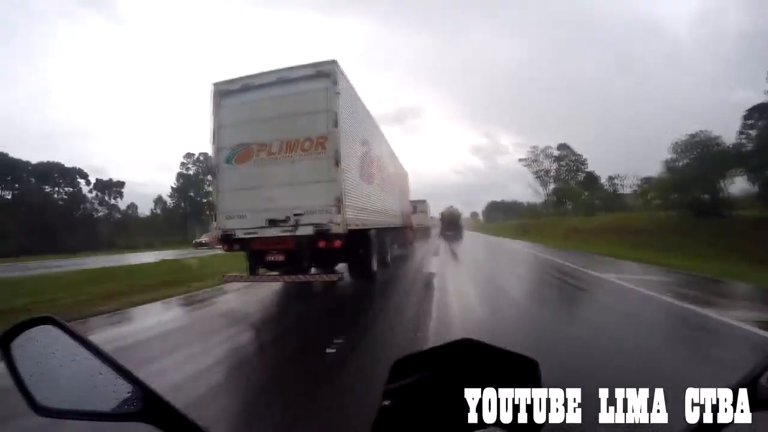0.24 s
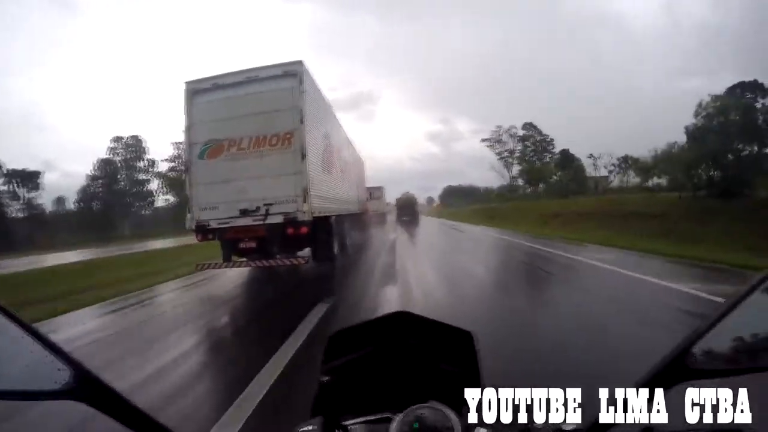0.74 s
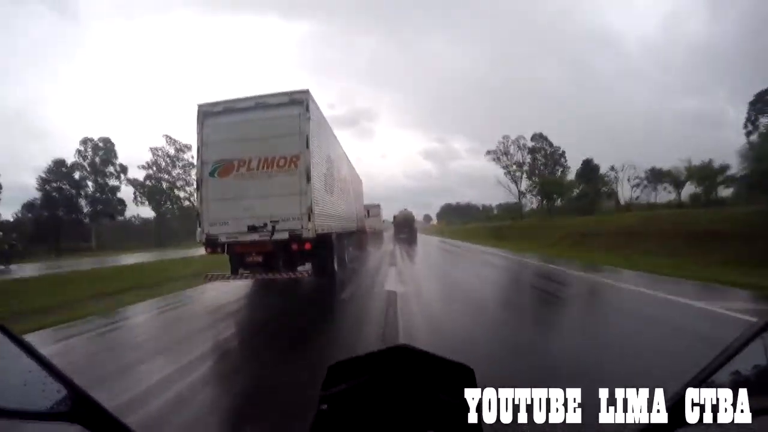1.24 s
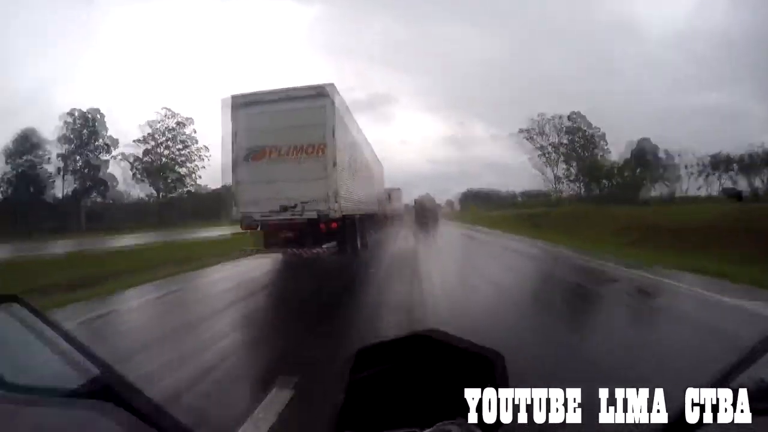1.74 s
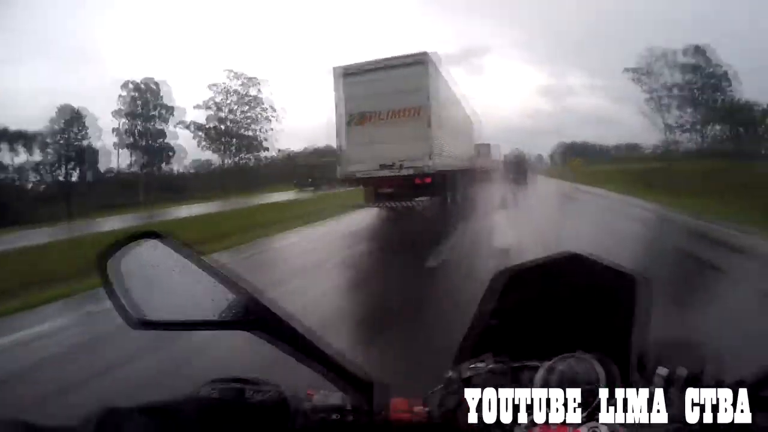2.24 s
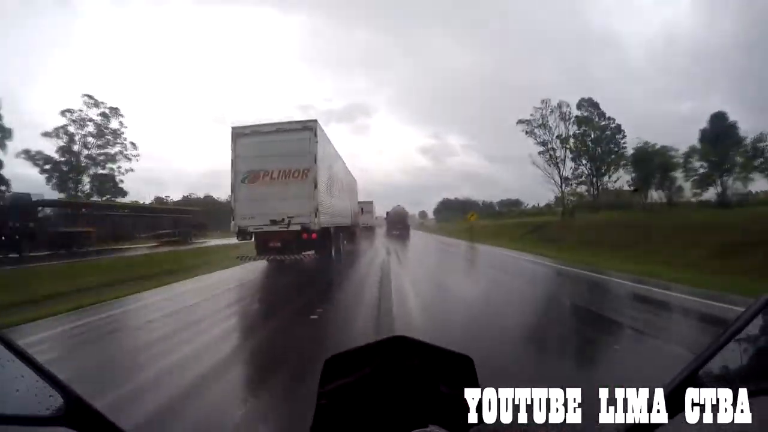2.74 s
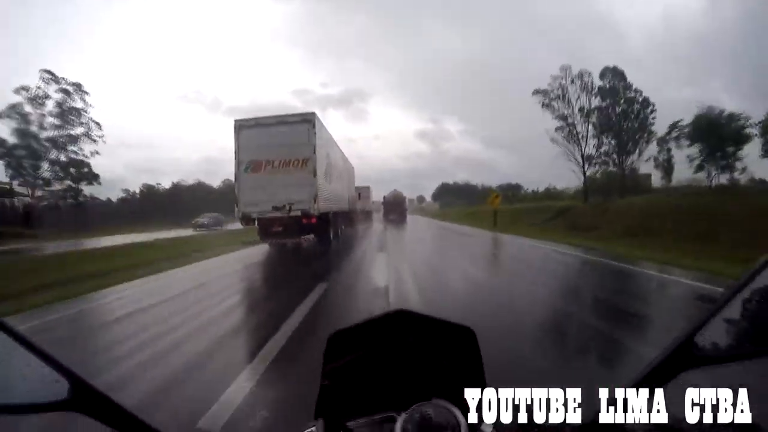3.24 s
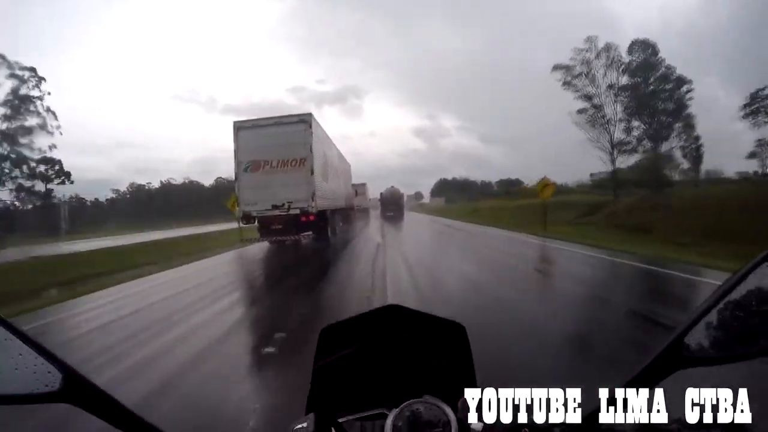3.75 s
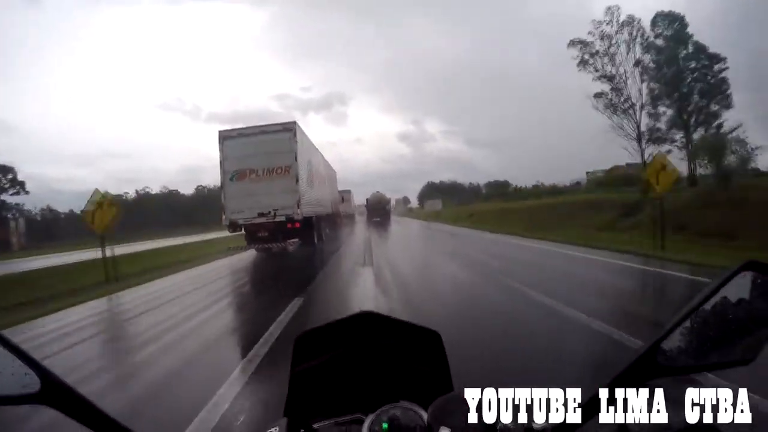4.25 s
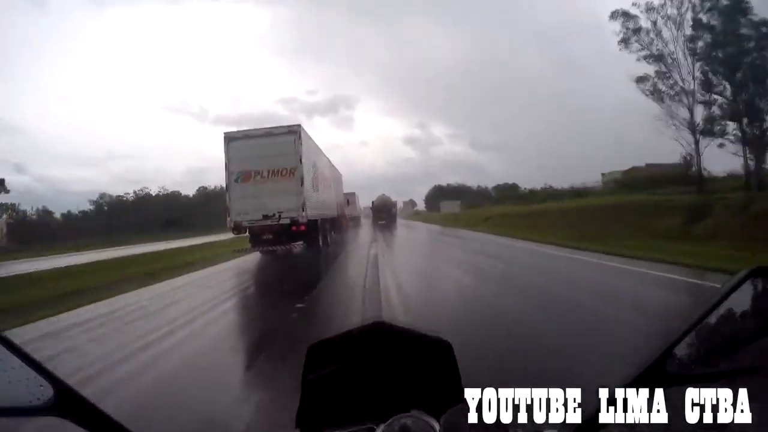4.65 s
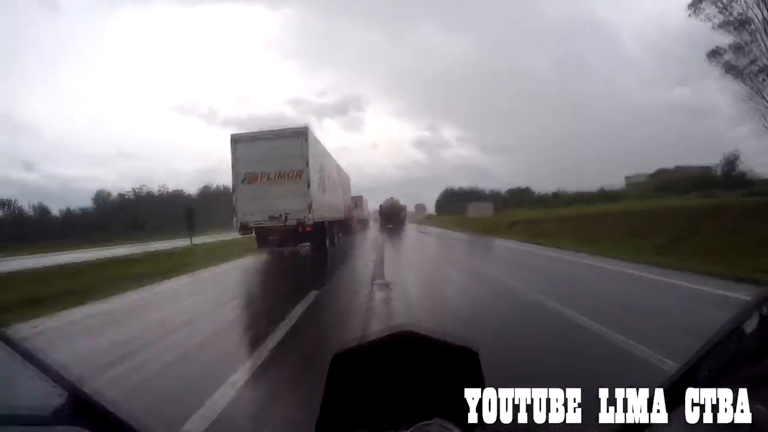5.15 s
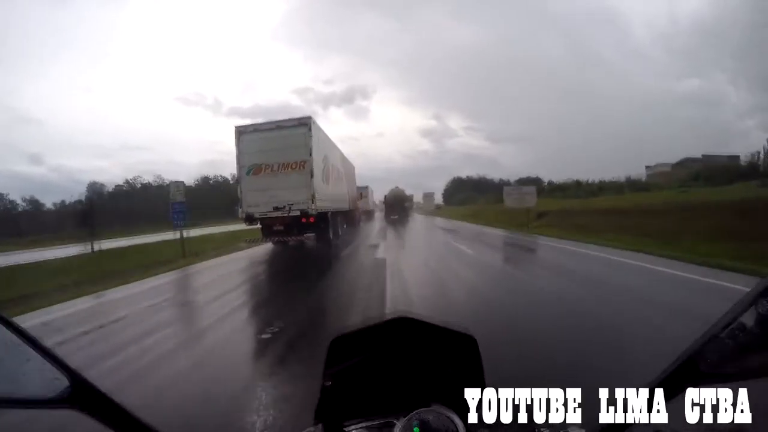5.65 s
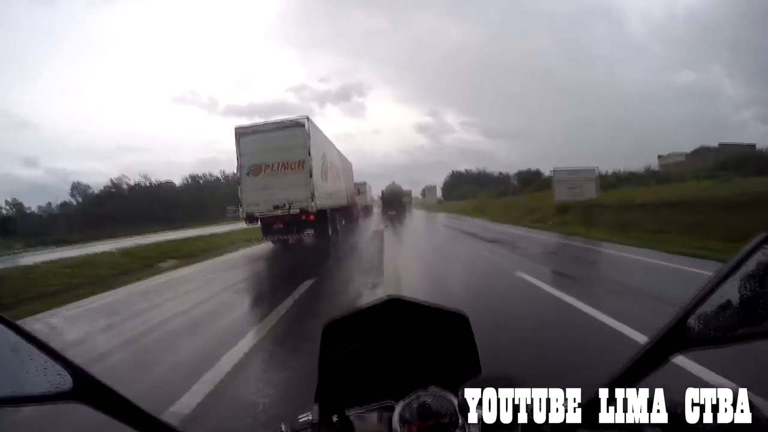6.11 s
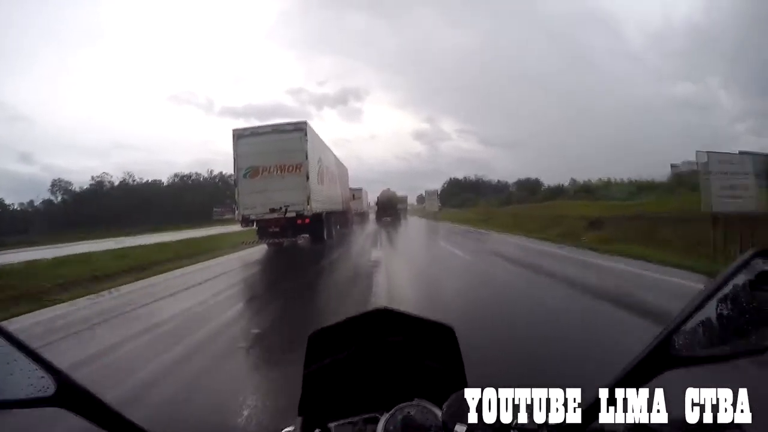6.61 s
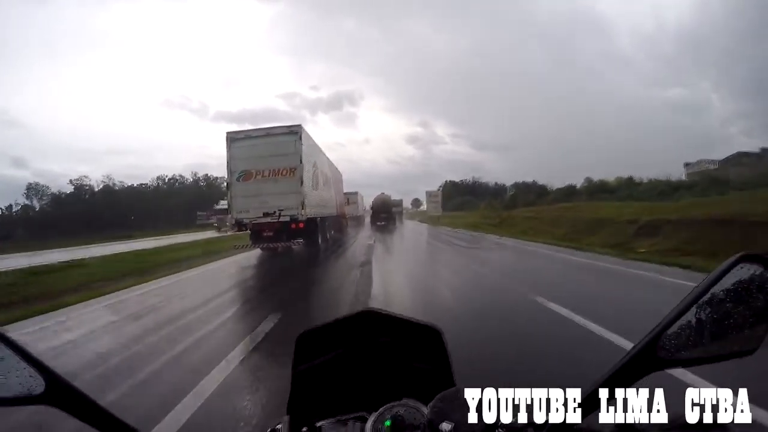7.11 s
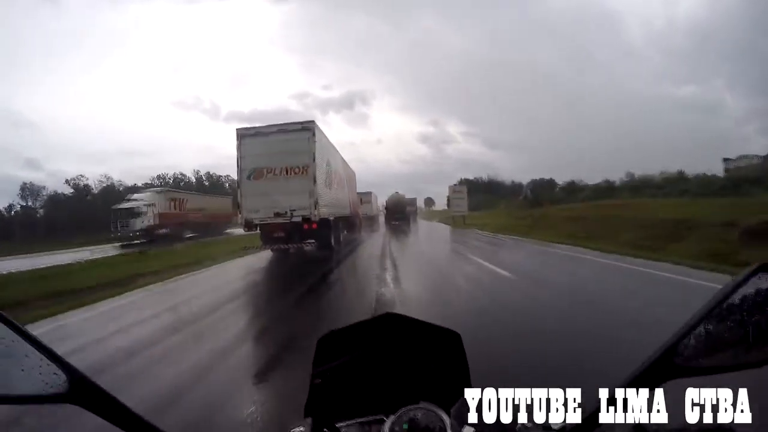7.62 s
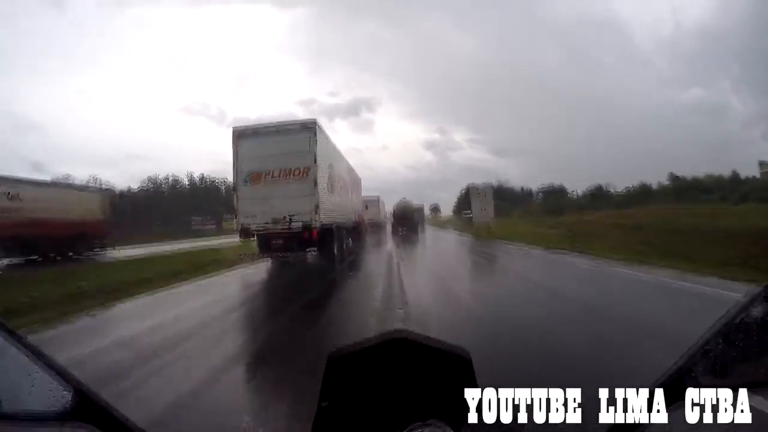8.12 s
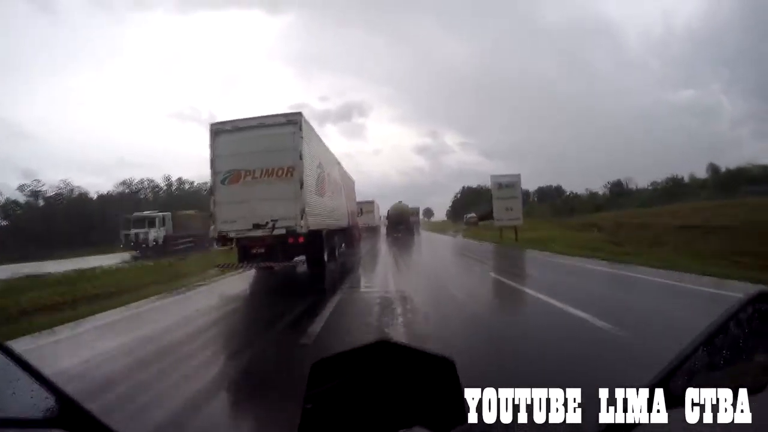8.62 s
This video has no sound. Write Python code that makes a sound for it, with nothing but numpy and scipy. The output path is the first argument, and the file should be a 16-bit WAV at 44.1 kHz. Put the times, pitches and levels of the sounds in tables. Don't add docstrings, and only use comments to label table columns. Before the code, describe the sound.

Close, muffled on-board sound of a motorcycle at speed on wet asphalt. Dense buffeting wind and road roar surround a low engine hum with rough upper overtones and a gear whine that emerges as speed grows. Brief throttle lifts thin the engine tone, then it pulls again, ending higher than it began. Spray hisses, a small part buzzes faintly, and scattered raindrops click and pat the microphone housing.

```python
import sys
import numpy as np
from scipy import signal
from scipy.io import wavfile

SR = 44100
rng = np.random.default_rng(int(sys.argv[2]) if len(sys.argv) > 2 else 0)


def decibels_to_gain(level_db):
    exponent = np.asarray(level_db, float) / 20
    return 10 ** exponent


def wav_out(sig):
    wavfile.write(sys.argv[1], SR, np.round(np.clip(np.atleast_2d(sig).T, -1, 1) * 32767).astype(np.int16))


N = 391166


def rms_one(x):
    return x / np.sqrt(np.mean(x ** 2) + 1e-20)


def in_time(rows):
    s, *columns = np.transpose(rows)
    return [np.interp(np.arange(N) / SR, s, c) for c in columns]


def at_hz(points, hz):
    f, level = np.array(points).T
    return np.interp(np.log(hz), np.log(f), level)


def bumps(rows):
    t = np.arange(N) / SR
    return sum(db * np.exp(-((t - s) / half_s) ** 2) for s, db, half_s in rows)


def drift(rate):
    pole = np.exp(-80 * np.pi * rate / SR)
    chance = rng.standard_normal(N // 40 + 2002)
    slow = signal.lfilter([1], [1, -2 * pole, pole * pole], chance)[2000:]
    return np.interp(np.arange(N) / 40, np.arange(len(slow)), rms_one(slow - slow.mean()))


# t/s, f/Hz
FIRING_RATE = [(0.0, 128.8), (1.06, 136.2), (1.32, 131.2), (2.0, 128.8), (2.46, 128.6), (3.44, 136.0),
               (4.77, 144.0), (4.9, 137.8), (5.07, 140.0), (5.57, 134.5), (5.78, 138.4), (5.95, 135.4),
               (6.56, 140.8), (7.16, 147.7), (8.38, 158.9), (8.58, 158.8), (8.7, 150.8), (8.87, 152.6)]
# t/s, opening (0 to 1)
THROTTLE_OPENING = [(0, 1), (1.1, .9), (1.3, 0), (1.95, 0.6), (2.15, 1), (2.4, 1), (3.3, 1), (4.78, 0.85),
                    (4.98, 0.1), (5.1, 0.5), (5.65, .2), (5.85, 1.0), (7.0, .95), (8.56, 0.9), (8.63, 0),
                    (8.87, 0)]


def ride():
    (firing_hz,), (throttle,) = in_time(FIRING_RATE), in_time(THROTTLE_OPENING)
    turn = 2 * np.pi * np.cumsum(firing_hz * (1 + .0015 * drift(10.8))) / SR
    return firing_hz, turn, 1 - np.clip(throttle, 0, 1)


# t/s, level/dB
EXHAUST_BEAT = [(0, -22), (.3, -19.5), (1.1, -20), (1.8, -18), (2.0, -21.5), (2.25, -23), (2.7, -18.5),
                (3.3, -19.5), (4.2, -17.5), (4.6, -20), (5.3, -16), (5.65, -19.5), (6.1, -18), (6.9, -17.5),
                (7.3, -20.5), (7.9, -19), (8.5, -23), (8.87, -22)]
# f/Hz, level/dB
SILENCER_PASSAGE = [(255, -8.5), (272, -4.5), (290, -11), (310, -16), (385, -18.5), (415, -10.5),
                    (438, -10), (470, -17.5)]


def exhaust(firing_hz, turn, shut):
    beat_db, = in_time(EXHAUST_BEAT)
    steady_db = beat_db.mean()
    second_db = steady_db + at_hz(SILENCER_PASSAGE, 2 * firing_hz) - 8 * shut
    third_db = steady_db + at_hz(SILENCER_PASSAGE, 3 * firing_hz) - 11 * shut
    out = 0
    for order, level_db, waver_db in [(1, beat_db, 1.2), (2, second_db, 1.6), (3, third_db, 2.0)]:
        gain = decibels_to_gain(level_db + 4 + waver_db * drift(40))
        out = out + gain * np.sin(order * turn + rng.uniform(0, 2 * np.pi))
    return out


UPPER_ORDER = [3.333, 4, 5.333, 6, 7, 8, 8.667, 9, 9.333, 9.667, 10.667, 11, 11.333, 12, 12.667, 13, 16,
               30.667, 32]
UPPER_ORDER_DB = [-41, -44, -48, -50, -51, -61, -60, -54, -53, -58, -58, -54, -58, -57, -61, -62, -65, -83,
                  -88]
# centre f/Hz, width f/Hz, peak level/dB
FRAME_RESONANCE = [(635, 35, 11), (830, 45, 7), (1100, 100, 18), (1470, 90, 7), (1700, 90, 5),
                   (2120, 150, 7), (4200, 300, 18.5)]


def upper_orders(firing_hz, turn, shut):
    out = 0
    for order, level_db in zip(UPPER_ORDER, UPPER_ORDER_DB):
        hz = order * firing_hz
        lift_db = sum(peak_db / (1 + ((hz - centre_hz) / width_hz) ** 2)
                      for centre_hz, width_hz, peak_db in FRAME_RESONANCE)
        gain = decibels_to_gain(level_db + lift_db - 16 * shut + 2.8 * drift(18))
        out = out + gain * np.sin(order * turn + rng.uniform(0, 2 * np.pi))
    return out


def gear_whine(firing_hz, turn, shut):
    gear_order, ripple_rad, firings_per_tug = 7.56, .8, 11
    slow_db = np.minimum(1.1 * (firing_hz - 136.5), 0)
    gain = decibels_to_gain(-33.8 + slow_db - 16 * shut + 2.0 * drift(25))
    return gain * np.sin(gear_order * turn + ripple_rad * np.sin(turn / firings_per_tug))


def case_buzz(firing_hz, turn, shut):
    centre_hz, width_hz, level_db = 4110, 200, -65
    band = signal.butter(2, [centre_hz - width_hz / 2, centre_hz + width_hz / 2], "band", fs=SR, output="sos")
    buzz = rms_one(signal.sosfilt(band, rng.standard_normal(N))) * (1 + 0.3 * np.cos(turn / 3))
    detuned_db = -np.minimum(0.1 * (firing_hz - 132) ** 2, 20)
    return decibels_to_gain(level_db + detuned_db - 7.3 * shut + 1.2 * drift(3)) * buzz


# f/Hz, level/dB
PORT_DIFFERENCE = [(25, -34.5), (250, -40.5), (700, -46.5), (1300, -35.5), (2200, -15.5), (4000, -13),
                   (6000, -2.5), (15000, 0.5)]


def coloured_noise(spectrum, own_db, rate):
    lowest, highest = spectrum[0][0], spectrum[-1][0]
    edges = lowest * 2 ** np.arange(0, np.log2(highest / lowest) + .2, 1 / 3)
    white = rng.standard_normal((2, 2, N + SR // 2))
    eddy = decibels_to_gain(5.3 * drift(9))
    out = 0
    for k, (low, high) in enumerate(zip(edges, edges[1:])):
        band = signal.butter(2, [low, high], "band", fs=SR, output="sos")
        mid, side = signal.sosfilt(band, white[k % 2])[:, SR // 2:]
        hz = np.sqrt(low * high)
        gain = decibels_to_gain(at_hz(spectrum, hz) + own_db * drift(rate))
        out = out + gain * (mid + decibels_to_gain(at_hz(PORT_DIFFERENCE, hz)) * eddy * side * [[1], [-1]])
    return rms_one(out)


# t/s, level/dB
AIRFLOW_SWING = [(0, 0), (.8, 2), (1.3, 1.5), (1.55, -2.5), (1.85, -0.5), (2.3, -0.5), (2.9, 1.5),
                 (3.2, 0.5), (4.3, 1.5), (4.9, 1), (5.1, -2.5), (5.6, 0.5), (6.1, 0.5), (7.2, 1),
                 (7.45, -2.5), (8.0, 0.5), (8.6, 0), (8.87, -2.5)]


def airflow():
    return in_time(AIRFLOW_SWING)[0]


# f/Hz, spectral level/(dB per Hz)
BUFFET_SPECTRUM = [(18, 1.5), (28, -1.3), (60, -4), (110, -7.5), (190, -12), (300, -25), (420, -35)]
# t/s, level/dB, half length t/s
WIND_SURGES = [(.14, 5, 0.023), (.85, 2, .05), (1.1, 5.5, 0.07), (1.33, 4.5, 0.16), (1.95, 3.5, 0.19),
               (2.1, -1.5, 0.036), (2.95, 2.5, 0.2), (4.6, 4, 0.17), (4.95, 3.5, .05), (5.2, 1, 0.048),
               (5.8, 3.5, 0.035), (6.1, -1.5, 0.16), (7.2, 3.5, 0.16), (7.55, -0.5, .05), (8.02, 6, 0.073),
               (8.42, 5, 0.058), (8.65, 4, 0.033)]


def wind_buffet(flow_db):
    level_db = -22.5 + 0.097 * flow_db + bumps(WIND_SURGES)
    return decibels_to_gain(level_db + 1.5) * coloured_noise(BUFFET_SPECTRUM, own_db=2.0, rate=3.0)


# f/Hz, spectral level/(dB per Hz)
ROAR_SPECTRUM = [(150, -2), (230, 2), (350, -2), (470, 2), (700, -6), (950, -9.5), (1150, -10.5),
                 (1400, -18.5), (1800, -26.5)]


def tyre_roar(flow_db):
    level_db = -31 + flow_db + 0.62 * drift(3.5)
    return decibels_to_gain(level_db + 4) * coloured_noise(ROAR_SPECTRUM, own_db=-0.03, rate=44.0)


def spray_level(flow_db, firing_hz):
    return -48.5 + flow_db + 0.02 * (firing_hz - 138) + 2.2 * drift(1.4)


# f/Hz, spectral level/(dB per Hz)
SPRAY_SPECTRUM = [(1200, -11.5), (1600, 6.5), (2100, 2.5), (2600, -5), (3200, -4), (3700, -15), (4400, -18),
                  (4900, -25.5), (5600, -38)]


def spray_hiss(spray_db):
    return decibels_to_gain(spray_db - 1.5) * coloured_noise(SPRAY_SPECTRUM, own_db=-2.0, rate=30.0)


def air_and_road(turn, flow_db, spray_db):
    puff = 1 + 0.14 * np.cos(turn)
    outside = wind_buffet(flow_db) + puff * (tyre_roar(flow_db) + spray_hiss(spray_db))
    wall = signal.butter(6, 5200, fs=SR, output="sos")
    return signal.sosfilt(wall, outside)


# t/s, level/dB, half length t/s
LEVEL_SWELLS = [(1.2, -3, 0.019), (1.48, -1.5, 0.054), (2.27, -2, 0.035), (3.9, 1, 0.034), (4.045, 1, 0.0076),
                (4.44, -1.5, 0.044), (4.69, -4, 0.056), (4.81, 1, 0.015), (5.4, -4, 0.032), (5.58, 0, .02),
                (6.88, 2.5, .06), (7.39, -5, .04), (7.741, 6, 0.016), (7.83, -5.5, .023), (8.0, 1, 0.03),
                (8.16, -3, 0.056), (8.55, -3, 0.025), (8.715, 5, 0.027), (8.79, -2.5, .03)]


def common_swing():
    return decibels_to_gain(1.0 * drift(14) + 0.21 * drift(69) + bumps(LEVEL_SWELLS))


# t/s, tick peak level/dB
LARGE_DROPS = [(0.1477, -39), (0.3531, -42), (0.4696, -41), (0.7226, -41), (0.7367, -41), (0.9838, -41),
               (1.0302, -40), (1.4408, -42), (2.0968, -42), (2.2315, -42), (2.5824, -41), (2.8864, -39),
               (2.919, -41), (2.9414, -40), (3.0549, -41), (3.1627, -41), (3.4051, -40), (3.509, -39),
               (3.7214, -41), (4.1188, -41), (4.2609, -38), (4.5599, -35), (4.877, -42), (5.7937, -42),
               (6.427, -39), (6.624, -41), (6.8589, -38), (7.1053, -41), (7.9927, -40), (8.7012, -34)]
# start t/s, length t/s, number of drops
DROP_FLURRIES = [(.08, .09, 4), (.32, .1, 5), (.76, .26, 7), (1.12, .05, 5), (1.28, .15, 6), (1.65, .3, 6),
                 (2.0, .4, 6), (2.49, .13, 3), (2.73, .34, 7), (3.22, .3, 5), (3.62, .36, 9),
                 (4.23, .12, 7), (4.5, .27, 7), (4.84, .15, 6), (5.0, .16, 3), (5.3, .03, 1),
                 (5.43, .03, 2), (5.58, .05, 1), (5.74, .48, 18), (6.38, .12, 4), (6.6, .25, 7),
                 (7.01, .4, 15), (7.7, .07, 3), (7.99, .12, 8), (8.33, .18, 9), (8.62, .13, 3)]


def strikes():
    slots = []
    for s, length_s, count in DROP_FLURRIES:
        slots += [(s + length_s * k / count, length_s / count) for k in range(count)]
    start, length = np.transpose(slots)
    chance = rng.random((len(start), 2))
    middling_db = -49 + 7.5 * chance[:, 1] ** 1.5
    return np.r_[LARGE_DROPS, np.c_[start + length * chance[:, 0], middling_db]]


def raindrops(drops):
    near = rng.choice(drops[:, 0], 800) + .045 * rng.standard_normal(800)
    fine_db = np.minimum(-63.0 + 4.0 * rng.exponential(1, 800), -50)
    fine = np.c_[np.clip(near, 0, N / SR - .001), fine_db]
    s, peak_db = np.r_[drops, fine].T
    chance = rng.standard_normal((len(s), 6))
    ticks, pushes = np.zeros((2, N)), np.zeros(N)
    for side, toward in enumerate([.5, -.5]):
        height = np.sign(chance[:, 2]) * decibels_to_gain(peak_db + 18.0 + toward * 3.0 * chance[:, 4])
        at = np.clip(s * SR + 1.5 * chance[:, side] ** 3, 0, N - 40).astype(int)
        np.add.at(ticks[side], at, height)
        rebound = at + np.minimum(8 + 7.2 * np.abs(chance[:, 5]), 30).astype(int)
        np.add.at(ticks[side], rebound, -.45 * height)
    push_height = np.sign(chance[:, 3]) * decibels_to_gain(.6 * (peak_db + 36.5) - 15.5)
    np.add.at(pushes, (s * SR).astype(int), push_height)
    tick = signal.butter(1, [1500, 6500], "band", fs=SR, output="sos")
    tick = np.r_[tick, signal.butter(1, 15000, fs=SR, output="sos")]
    span = np.arange(400) / SR
    push = (span / 0.00096) ** 2 * np.exp(2 - 2 * span / 0.0011)
    return signal.sosfilt(tick, ticks + 1e-18) + signal.fftconvolve(pushes, push)[:N]


# f/Hz, spectral level/(dB per Hz)
MIST_SPECTRUM = [(4500, -2), (6000, 0.1), (8000, -3), (9500, -8), (11000, -22), (13000, -32), (15700, -42)]


def mist(drops, spray_db):
    hits = np.zeros(N)
    hits[(drops[:, 0] * SR).astype(int)] = 1
    flurry = np.minimum(signal.fftconvolve(hits, np.hanning(round(.07 * SR)), "same"), 1.5)
    level_db = -74.5 + .5 * (spray_db + 48) + 2.2 * flurry + 1.5 * drift(12)
    hiss = coloured_noise(MIST_SPECTRUM, own_db=2.0, rate=20.0)
    dull = signal.sosfiltfilt(signal.butter(4, 10000, fs=SR, output="sos"), hiss)
    bright = decibels_to_gain(11.0 * (flurry - .8)) * (hiss - dull)
    return decibels_to_gain(level_db) * (dull + bright)


def scene():
    firing_hz, turn, shut = ride()
    motor = exhaust(firing_hz, turn, shut) + upper_orders(firing_hz, turn, shut)
    motor = motor + gear_whine(firing_hz, turn, shut) + case_buzz(firing_hz, turn, shut)
    flow_db = airflow()
    spray_db = spray_level(flow_db, firing_hz)
    swung = common_swing() * (motor + air_and_road(turn, flow_db, spray_db))
    drops = strikes()
    return swung + mist(drops, spray_db) + raindrops(drops)


def top_cut(x):
    return signal.sosfilt(signal.butter(12, 15830, fs=SR, output="sos"), x)


def record(dry):
    top = 1.1
    limited = top * np.tanh(dry / top)
    edge = np.minimum(np.arange(N)[::-1] / (.004 * SR), 1)
    return top_cut(edge * limited)


dry = scene()
out = record(dry)
wav_out(out)
```